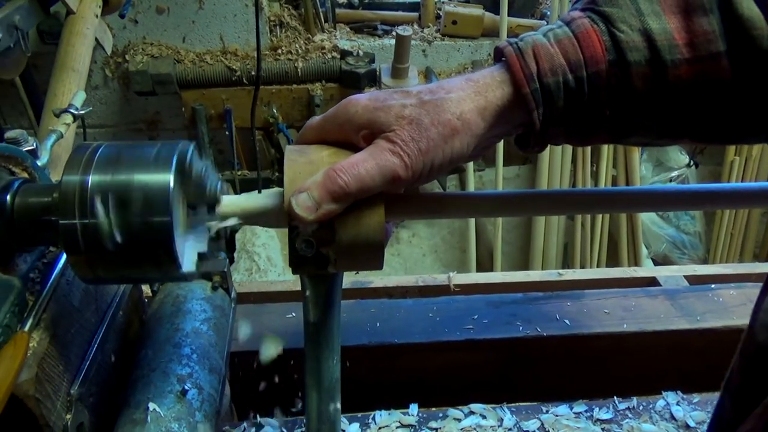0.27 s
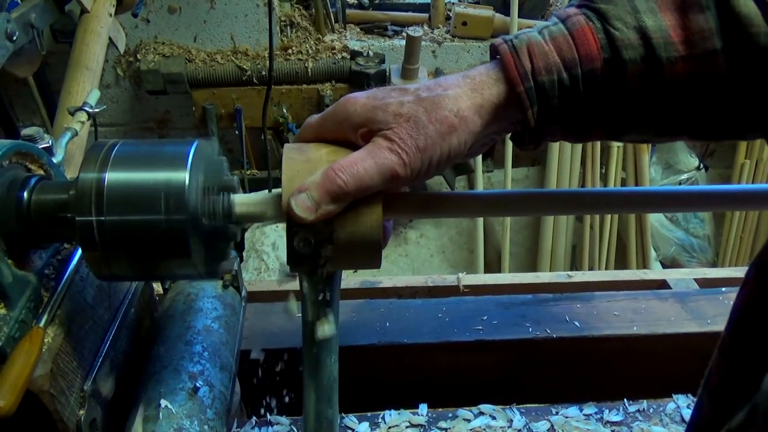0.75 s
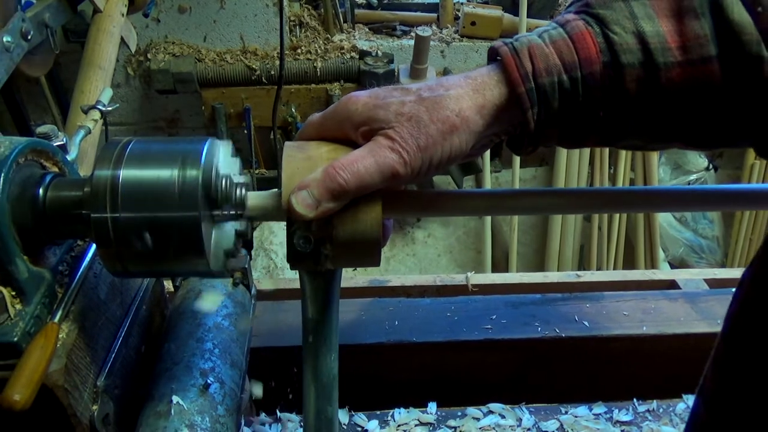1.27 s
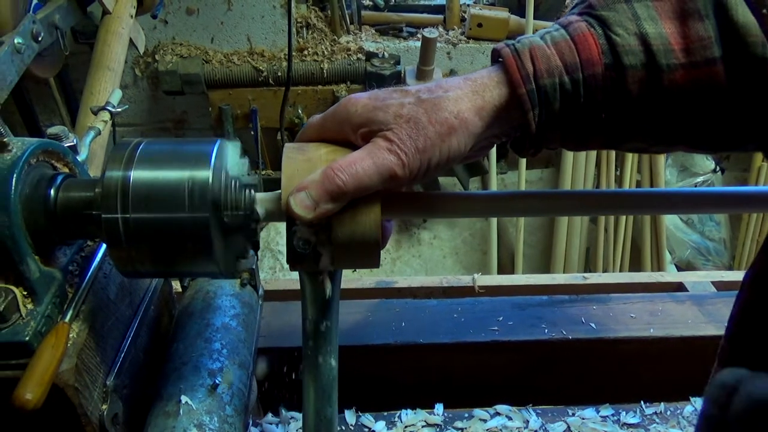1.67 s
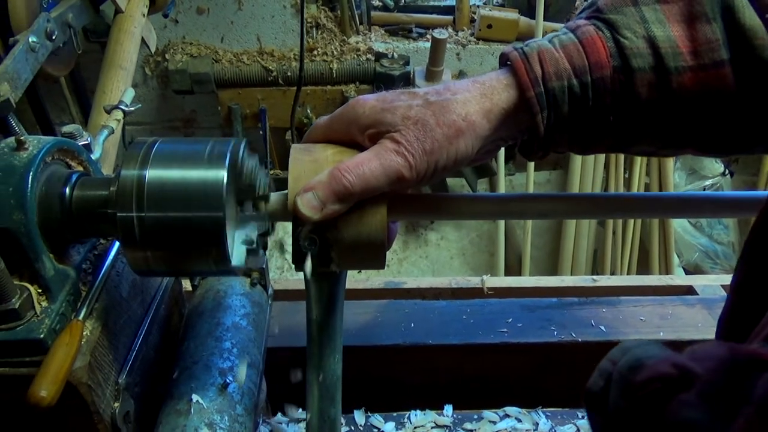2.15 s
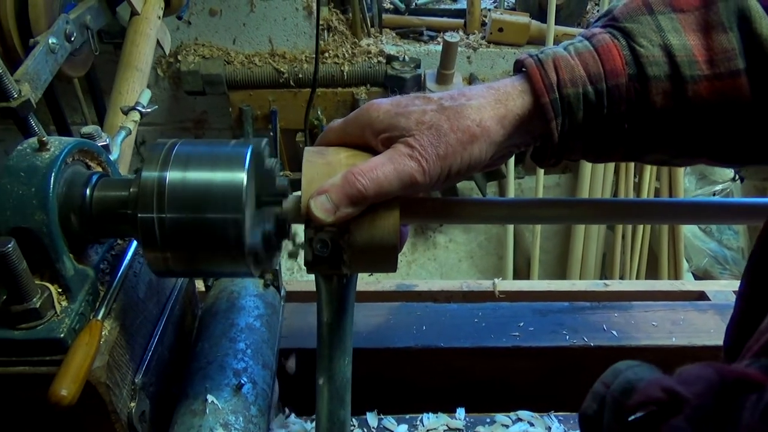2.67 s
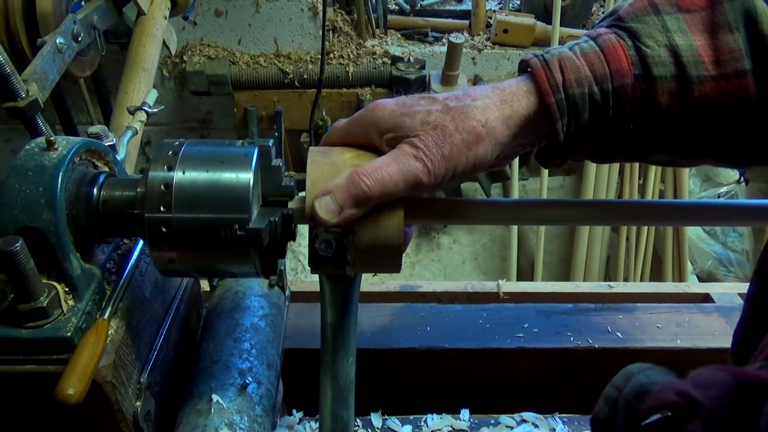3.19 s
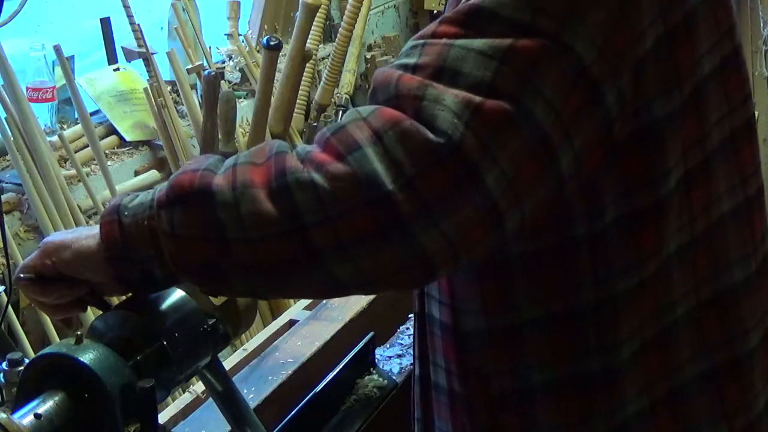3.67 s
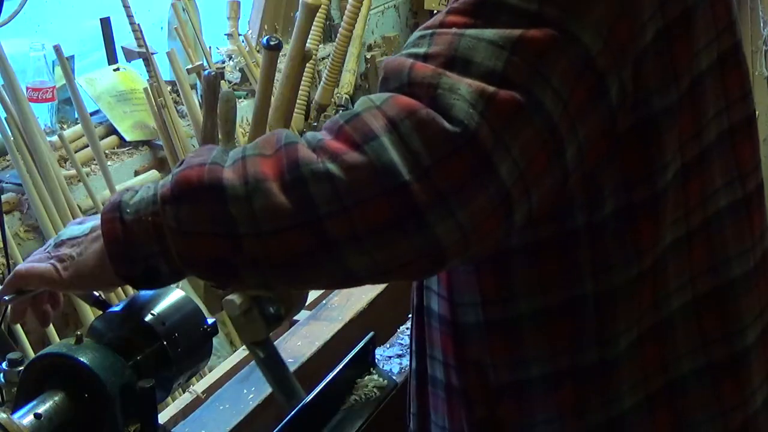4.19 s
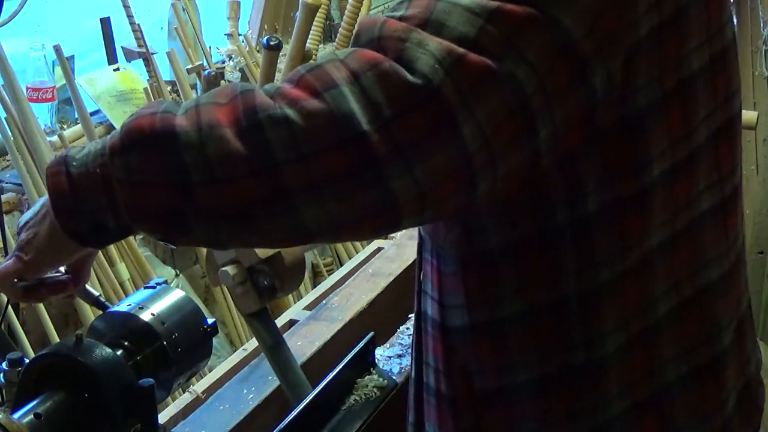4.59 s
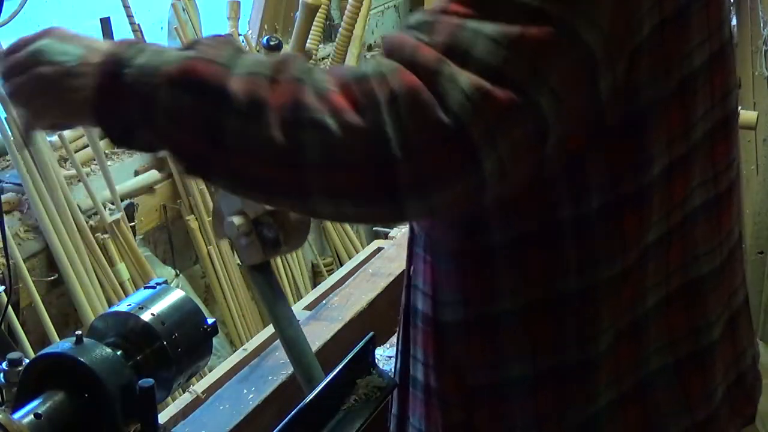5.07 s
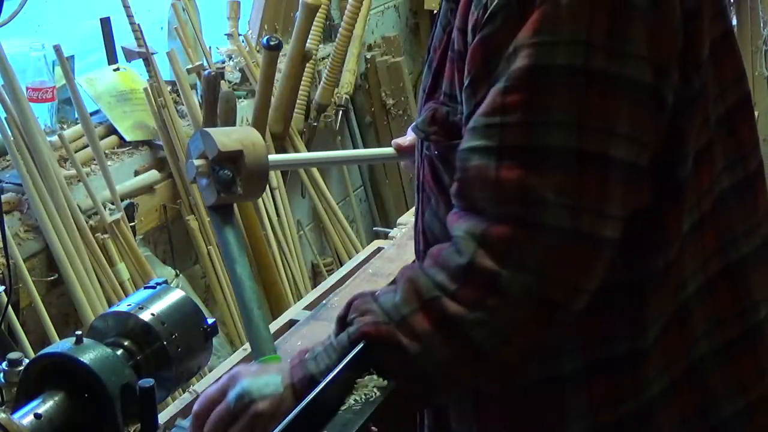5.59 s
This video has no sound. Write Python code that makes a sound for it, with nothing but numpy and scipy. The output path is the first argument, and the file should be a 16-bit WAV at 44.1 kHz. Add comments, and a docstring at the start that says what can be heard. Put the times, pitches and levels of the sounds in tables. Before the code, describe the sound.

From the start a wood lathe runs close by, its motor humming and the spinning rod whirring while a hand-held cutter shaves the wood with a pulsing hiss. Over it the blade gives a very high, warbling squeal, about fifteen chirps a second, creeping upward in pitch. Between 1.3 and 1.7 seconds the squeal shifts to a lower, still shrill register and grows stronger. The motor and hiss fade from about 2 seconds and are gone near 3; the squeal stops just after, leaving near silence. From 3.5 seconds there is quiet workshop room tone with very faint rapid ticking and a few light clinks. Around 4.5 seconds a metal key knocks in the chuck with a short ring, followed by a cluster of sharp clinks near 4.9. A sleeve rustles softly, two small clinks come around 5.4 seconds, and faint tones come and go.

```python
"""A lathe turns a long wooden rod through a hand-held rounding cutter: the motor hums, bed and rod whirr,
shavings hiss. Twice a turn stick-slip friction makes the blade squeal in a W-shaped glide, first in a
high register, then in a low one. Near 3 s the whirr fades away, the squeal last. After a near silence
the quiet workshop is heard, with faint ticks: a chuck key clinks, a sleeve rustles, the key knocks in
the chuck and sets its modes ringing, and faint tones come and go."""
import sys
import numpy as np
from scipy import signal
from scipy.fft import rfft, irfft, next_fast_len
from scipy.io import wavfile
from scipy.ndimage import uniform_filter1d

SR = 44100
rng = np.random.default_rng(int(sys.argv[2]) if len(sys.argv) > 2 else 0)


def log_audio(samples):
    """Write samples as a 16-bit WAV file to the path given in sys.argv[1]."""
    # one column per channel
    frames = np.atleast_2d(samples).T
    # limit to full scale, then quantise
    limited = np.clip(frames, -1, 1)
    pcm = np.round(limited * 32767).astype(np.int16)
    wavfile.write(sys.argv[1], SR, pcm)


N = 257529
TIME = np.arange(N) / SR

# The running lathe fades: t/s, motor level/dB, whirr level/dB, hiss level/dB
LATHE_FADE = [(0, -38.5, -36.5, -36), (1.3, -38.5, -37.5, -35.5), (1.9, -40.5, -39.5, -38),
              (2.3, -43.5, -43, -41.5), (2.55, -46, -48, -45.5), (2.72, -50.5, -53, -50),
              (2.8, -54.5, -60, -56), (2.86, -56.5, -66.5, -62), (2.93, -65.5, -88, -81),
              (3.08, -79, -93, -87), (3.2, -82, -96, -110), (3.3, -97, -110, -120)]
# Motor lines: f/Hz, level/dB re motor
HUM_LINES = [(100, -15.5), (199.5, -17.5), (399, -18.5), (517, -23.5), (700, -22)]
# Spectra of the whirr and the shaving hiss: f/Hz, relative density/dB
WHIRR_SPECTRUM = [(15, -58.5), (25, -27), (93, -4.5), (149, -11), (196, -8), (333, -9.5), (395, -5.5),
                  (701, -5), (1270, -10), (1670, -3.5), (2400, -12.5), (2620, -13), (4000, -29.5),
                  (5200, -47), (8800, -120)]
SHAVING_SPECTRUM = [(1760, -25), (3000, -3), (3280, -4.5), (3570, -12), (3800, -11), (4680, -4.5),
                    (5090, -12), (7050, 0.5), (8220, -5.5), (8750, -9.5), (9650, 0.5), (10300, -10),
                    (13300, -8), (15200, -23), (15800, -23)]
# Resonances of bed and rod, free length of rod, and cutter: f/Hz, nominal width/Hz, relative level/dB
BODY_MODES = [(727, 62, -13), (1140, 51, -15.5), (2106, 410, -21.5), (2606, 45, -17), (3050, 60, -16),
              (3188, 45, -17.5)]
ROD_MODES = [(1680, 143, -2)]
CUTTER_MODES = [(3446, 42, -25), (3560, 30, -26), (4004, 100, -24.5), (4700, 88, -24), (4800, 60, -25),
                (6145, 140, -15.5), (6570, 460, -22), (7150, 180, -10), (7940, 120, -10.5),
                (11700, 190, -29), (13900, 250, -22)]
# Dips in the lathe's sound where paths cancel: f/Hz, width/Hz
NOTCHES = [(2440, 43), (3340, 82), (3950, 26), (4200, 26)]
# The off-round blank meets the blade twice a turn. One row per bite and register:
# t/s, length/ms, base pitch f/Hz, base level/dB, extra level at entry/dB, tilt from start to end/dB
BITES = [(-0.0437, 63.0, 8200, -62, 0, 58), (0.0193, 73.5, 8600, -42.5, -25.5, -12.5),
         (0.093, 62.5, 8700, -43, -27, -4), (0.1553, 65.7, 8780, -43.5, -8, -1),
         (0.221, 64.9, 8770, -42.5, -19.5, -4.5), (0.2864, 68.5, 8940, -40.5, -24.5, -2),
         (0.3542, 65.4, 8950, -42, -4, -2.5), (0.419, 68.1, 8920, -39.5, -12, -1),
         (0.4879, 62.8, 8950, -42, -5, 3), (0.551, 71.6, 9060, -40.9, -6.5, -8),
         (0.6223, 65.2, 9270, -42.5, 8, -6), (0.6873, 64.7, 9120, -41.9, 1, 2),
         (0.7524, 65.8, 9540, -39, -13, -8), (0.818, 62.3, 9610, -40, -4, -4.5),
         (0.8804, 67.6, 9600, -39.7, -24.5, -1), (0.948, 69.2, 9670, -38.3, -16.5, -30.5),
         (1.0171, 65.9, 9900, -40, -20, -8.5), (1.083, 67.1, 9800, -37, -11.5, -13.5),
         (1.1507, 65.1, 9770, -40.9, 4.5, -1.5), (1.2158, 62.5, 9930, -42.9, -16.5, -54.5),
         (1.2782, 63.5, 10350, -51, 28.5, 17.5), (1.2792, 77.2, 5600, -57, -15.5, -47),
         (1.3412, 69.4, 10360, -44.5, 3, 14), (1.3571, 52.1, 5390, -69, 24.5, 19.5),
         (1.4077, 74.6, 5570, -55, -13.5, -40), (1.41, 64.8, 10480, -47, 21, 21),
         (1.4764, 62.8, 10400, -41.5, -14, -13), (1.4831, 58.0, 5750, -43, -5.5, -9.5),
         (1.5376, 69.6, 10400, -54.8, 8.5, 35), (1.541, 66.6, 5630, -53, -13, -36),
         (1.6085, 64.8, 5450, -48, -25, 0), (1.6078, 62.4, 10450, -55.5, 4.5, 35),
         (1.6701, 70.7, 10430, -62, -25, 55), (1.6732, 68.5, 5880, -47.1, -9, -20),
         (1.7408, 64.3, 5580, -42.5, -15, 13.5), (1.8051, 66.1, 6050, -42, 2, -1.5),
         (1.8712, 64.4, 5640, -40, -25, 11.5), (1.9355, 66.6, 6090, -42, 11, 6),
         (2.002, 66.5, 5760, -39, -3.5, 13.5), (2.0691, 65.7, 6160, -40.5, -0.5, 2),
         (2.1349, 65.9, 5890, -37.5, -8.5, 12), (2.2015, 63.7, 6330, -40.1, 13.5, 14),
         (2.2641, 65.0, 6020, -35.5, -11, 8), (2.3291, 68.7, 6420, -40, -9, 11),
         (2.3978, 65.7, 6050, -36.5, 0, 16), (2.4633, 64.0, 6490, -39, -5.5, 5),
         (2.5282, 65.1, 6070, -36, 5.5, 8), (2.5931, 66.6, 6510, -38, 12.5, 10.5),
         (2.659, 66.4, 6080, -37.5, 10, 16), (2.7256, 67.1, 6470, -39.7, 16, 14),
         (2.793, 61.8, 6010, -37.5, 8, 10.5), (2.8543, 66.3, 6450, -38.5, 19, 15),
         (2.9222, 84.1, 6190, -36, 4.5, 14.5), (3.005, 137.8, 6640, -41.5, 13.5, 9.5)]
# W-shaped course of a bite on the blank's faces A and B, as offsets from its base:
# share of bite, f on A/Hz, f on B/Hz, level on A/dB, level on B/dB
HIGH_COURSE = [(0.0, 2032.5, 1060, -13.5, -16.5), (0.079, 1388.5, 1050, -9.5, 6.5),
               (0.15, 690.5, 972.5, -1, 10), (0.23, 41, 90.5, 5, 0.5), (0.31, 11, -190, 3.5, -1),
               (0.38, 159.5, -80.5, 5.5, 3), (0.461, 410, 160.5, 3.5, 4), (0.54, 550, 470.5, 7, 6),
               (0.62, 469.5, 350.5, 2.5, 5.5), (0.69, 49.5, -120, 8, 3.5), (0.77, -160, -170, 4.5, -1.5),
               (0.85, -50, -170, 4, 6), (0.92, 89.5, 102.5, 0.5, 0.5), (1.0, 338.5, 178, -20, -16)]
LOW_COURSE = [(0.0, 300, 370, -14, -9), (0.08, 1219.5, 869.5, -11.5, -8.5), (0.15, 1070, 1649.5, -3, -4),
              (0.23, 49.5, 529.5, 2.5, 2), (0.31, 22.5, 59.5, 3, 0.5), (0.38, 371, 590, 7, 2),
              (0.46, 368.5, 998.5, 7.5, 8), (0.54, 500, 1100.5, 8, 5.5), (0.62, 592.5, 1169.5, -0.5, 7),
              (0.69, 271.5, -1.5, -5.5, -4), (0.77, -400, 19.5, -2, -7), (0.85, 221, -33, 3.5, -7.5),
              (0.92, 350, 749, -4, -1), (1.0, 280.5, 910.5, -15, -5)]
# Blade modes that draw the squeal to themselves: f/Hz, pull (0-1), gain/dB
HIGH_MODES = [(8320, .65, 6), (9000, .45, 3), (9780, .82, 1), (10520, .85, 3), (11300, .3, -6)]
LOW_MODES = [(5775, 0.67, 7), (6220, 0.57, 1), (6460, 0.39, 2), (7060, 0.74, -7.5), (7950, 0.43, 5.5)]
# Lone peeps of the blade: t/s, length/ms, f/Hz, level/dB
PEEPS = [(0.074, 12, 12600, -47.5), (0.206, 14, 12650, -45.5), (0.274, 8, 12800, -44),
         (0.362, 15, 13600, -44), (0.391, 14, 13480, -45.5), (0.87, 20, 4860, -46), (0.976, 16, 13580, -47),
         (1.003, 18, 4960, -42.5), (1.367, 11, 9940, -35), (1.785, 15, 11300, -37), (2.045, 8, 11250, -41),
         (2.113, 8.9, 11230, -41), (2.177, 8.6, 11250, -42), (2.244, 6.7, 11200, -35),
         (2.379, 7.7, 11250, -42), (3.201, 12.4, 7920, -46)]
# The stopping motor lurches: t/s, length/ms, level/dB
LURCHES = [(2.98, 10.4, -59.5), (3.03, 14, -62.5), (3.12, 50, -78)]
# The quiet workshop: t/s, rumble level/dB, deep rumble level/dB, hiss level/dB
WORKSHOP_LEVELS = [(3.52, -69, -68, -67.5), (3.88, -65.5, -66, -71), (4.0, -63, -61, -71),
                   (4.3, -63, -63.5, -71), (4.7, -56.5, -63.5, -70), (5.33, -56.5, -62.5, -67),
                   (5.47, -60, -65, -69), (5.84, -63.5, -61, -66)]
# Spectra of its rumble, deep rumble and hiss, and of the sleeve: f/Hz, relative density/dB
RUMBLE_SPECTRUM = [(88, -41.5), (150, -12), (242, -2.5), (272, 0.5), (398, -9), (473, -2), (594, -10),
                   (634, -5), (947, -4.5), (1370, -32), (2000, -36), (2600, -59), (4400, -120)]
DEEP_SPECTRUM = [(12, -38), (20, -12), (48, -0.5), (64, -2.5), (108, -2.5), (180, -8), (230, -37),
                 (400, -120)]
HISS_SPECTRUM = [(1300, 2), (2000, -1), (3300, -2.5), (4100, -3.5), (5160, -7), (6100, 0.5), (9800, -4.5),
                 (12500, -2), (15800, -10)]
RUSTLE_SPECTRUM = [(2000, -6.5), (3500, -3), (5200, -51), (6500, 2.5), (10500, 4), (12500, 1), (15700, -6)]
# Key clinks: t/s, nominal peak level/dB, colour f/Hz, tail t60/s, tail level/dB, ring level/dB re crack
CLINKS = [(3.5372, -51.5, 2500, 0.097, -6, -10), (3.9887, -50.5, 9280, 0.08, -18, -8),
          (4.033, -47, 12200, 0.08, -18, -11), (4.4658, -46, 2270, 0.08, -13, 3),
          (4.561, -31.5, 6770, 0.13, -14, 1.5), (4.611, -50, 6350, 0.08, -18, -8),
          (4.7057, -53, 2230, 0.08, -16, -6), (4.7354, -58, 7580, 0.08, -18, -13),
          (4.7536, -43.5, 13700, 0.097, -11, -6), (4.8264, -30, 9500, 0.063, -17, 3),
          (4.866, -35.5, 9440, 0.088, -4, -4), (4.874, -37, 10100, 0.08, -16, -6),
          (4.8789, -31.5, 8750, 0.087, -3, -0.5), (4.897, -33, 9250, 0.08, -19, -4),
          (4.9044, -44, 6700, 0.08, -18, -8), (5.3444, -44.5, 9750, 0.11, -7, -8),
          (5.4261, -47, 8260, 0.08, -18, -8)]
# Modes of the key: f/Hz, relative level/dB, t60/s
KEY_MODES = [(2660, -19, 0.019), (4100, 5, 0.0079), (6200, -7, .025), (6850, 8, 0.011), (7600, -3, 0.018),
             (9160, 1, 0.021), (9830, 5, 0.022), (10500, -15, .02), (12600, -20, .015)]
# The key knocks in the chuck: t/s, nominal peak level/dB, rattle length/ms
KNOCKS = [(4.468, -29, 31), (4.583, -30, 17), (4.609, -40.5, 55), (4.705, -59, 16)]
# Modes of the chuck: f/Hz, relative level/dB, nominal t60/s
CHUCK_MODES = [(510, -5, 0.37), (650, -8, 0.13), (815, -8.5, 0.31), (874, 5.5, .12), (922, -2.5, 0.21),
               (1100, -28, .12), (1230, -16, .15), (1386, -19, 0.41), (1870, -14, 0.069), (2240, -16, 0.11)]
# Sleeve rustles, the key dragging over metal, and deep thuds: t/s, length/ms, level/dB
RUSTLES = [(3.93, 55, -72.5), (4.03, 73, -65.5), (4.1, 42, -63.5), (4.88, 53, -64), (5.13, 70, -72),
           (5.27, 230, -71), (5.44, 61, -66), (5.75, 310, -66)]
SCUFFS = [(4.84, 24, -56.5), (4.91, 40, -65)]
THUDS = [(4.87, 80, -66), (5.5, 110, -63)]
# Faint tones: start t/s, end t/s, f/Hz, waver/Hz, level/dB
FAINT_TONES = [(4.6, 5.1, 275, 10, -66), (5.2, 5.62, 280, 10, -67), (5.1, 5.35, 775, 6, -71),
               (5.67, 5.85, 3208, 2, -73.5), (5.63, 5.85, 3941, 2, -79), (5.58, 5.85, 7677, 15, -79),
               (5.6, 5.85, 9133, 12, -82)]
# Echoes that differ between the two microphone ports: f/Hz, side level/dB re mid
SIDE_SPECTRUM = [(30, -17.5), (110, -31.5), (190, -27.5), (260, -12), (460, -19), (820, -15.5), (1100, -27),
                 (1470, -36), (1960, -17), (2500, -15), (2900, -61.5)]
# Lean towards one port: f/Hz, left minus right level/dB
LEAN_SPECTRUM = [(30, 0), (200, 0), (260, 1), (460, -1.8), (610, .8), (1000, -.3), (1600, 1.3), (2200, .5),
                 (2700, 0)]

HISS_PULSE_HZ, BRIGHTEN_DB_PER_S, LURCH_WHIRR_DB = 18, 1.58, -21
OVERTONE_DB, SQUEAL_ROUGHNESS, SLIP_LIMIT = -13.5, 0.13, 0.033
REGISTER_SPLIT_HZ, HIGH_PULL_WIDTH_HZ, LOW_PULL_WIDTH_HZ = 7700, 200, 320
ENTRY_END, ENTRY_FADE = 0.26, 0.08   # shares of a bite
GLIDE_LOSS_DB = 1   # per 100 Hz/ms of pitch movement
STOP_S, STOP_DB_PER_MS = 3.125, 10   # cutting stops and the squeal dies
WORKSHOP_FROM_S = 3.52
TICK_FROM_S, TICK_EVERY_S, TICK_DB = 3.556, 0.04005, -71
SHOP_T60_S, SHOP_DB, SHOP_SIDE_DB = 0.22, -19.5, -41
CUTOFF_HZ = 15740


def amp(db):
    """Amplitude ratio of a level: a factor of ten per 20 dB."""
    return 10 ** (np.asarray(db) / 20)


def unit_rms(x):
    """Normalisation to unit mean power."""
    return x / np.sqrt(np.mean(x ** 2) + 1e-20)


def in_time(rows):
    """Linear interpolation of each column at every sample."""
    s, *columns = np.transpose(rows)
    return [np.interp(TIME, s, c) for c in columns]


def at_hz(spectrum, hz):
    """Interpolation of a spectrum on a logarithmic frequency axis."""
    points_hz, db = np.transpose(spectrum)
    return np.interp(np.log(hz), np.log(points_hz), db, left=-90, right=-90)


def swells(rows):
    """Superposition of raised-cosine envelopes, each centred on its moment."""
    return sum(amp(db) * np.cos(np.pi * np.clip((TIME - s) / ms * 500, -.5, .5)) ** 2
               for s, ms, db in rows)   # ms is the width at half height


def drift(rate_hz):
    """Random fluctuation of unit rms: noise low-passed at the given rate."""
    step, settle = 40, 2000
    r = np.exp(-2 * np.pi * rate_hz * step / SR)
    slow = signal.lfilter([1], [1, -2 * r, r * r], rng.standard_normal(N // step + settle + 2))[settle:]
    return np.interp(np.arange(N) / step, np.arange(len(slow)), unit_rms(slow))


def filtered(x, hz, kind, order=2):
    """Filtering with a maximally flat passband."""
    return signal.sosfilt(signal.butter(order, hz, kind, fs=SR, output="sos"), x)


def resonance(x, hz, width_hz):
    """Forced response of a resonator: a two-pole band-pass with unit peak gain."""
    r = np.exp(-np.pi * width_hz / SR)
    gain = (1 - r * r) / 2
    return signal.lfilter([gain, 0, -gain], [1, -2 * r * np.cos(2 * np.pi * hz / SR), r * r], x)


def ring(x, hz, t60):
    """Damped oscillator: a unit impulse starts a decaying sine of unit amplitude."""
    r, w = amp(-60 / (t60 * SR)), 2 * np.pi * hz / SR
    return signal.lfilter([0, np.sin(w)], [1, -2 * r * np.cos(w), r * r], x + 1e-18)


def banded_noise(spectrum, flicker_db):
    """Random amplitude modulation of quarter-octave noise bands; unit rms."""
    bottom_hz, top_hz = spectrum[0][0], spectrum[-1][0]
    edges = np.geomspace(bottom_hz, top_hz, int(4 * np.log2(top_hz / bottom_hz)) + 1)
    out, together, white = 0, drift(8.5), rng.standard_normal((2, N))
    for k, (low, high) in enumerate(zip(edges, edges[1:])):
        db = at_hz(spectrum, np.sqrt(low * high)) + flicker_db * (0.2 * together + drift(19))
        out = out + amp(db) * filtered(white[k % 2], [low, high], "band")
    return unit_rms(out)


def resonant_noise(modes):
    """Random excitation of modes, each formed by two resonators in cascade."""
    white = rng.standard_normal(N)
    return sum(amp(db) * unit_rms(resonance(resonance(white, hz, 1.28 * width), hz, 3.0 * width))
               for hz, width, db in modes)


def lathe():
    """Forced vibration: mains hum, whirr in bed and rod, and shaving hiss; interference cuts notches."""
    motor_db, whirr_db, hiss_db = in_time(LATHE_FADE)
    lurch = swells(LURCHES)
    hum = sum(np.sqrt(2) * amp(db + 1.5 * drift(4.9))
              * np.sin(2 * np.pi * (hz * TIME + 0.042 * drift(15))) for hz, db in HUM_LINES)
    running = amp(-4.5) * banded_noise(WHIRR_SPECTRUM, flicker_db=1.9)
    rumble = filtered(running, 900, "low")
    pulse = amp(0.47 * np.sin(2 * np.pi * HISS_PULSE_HZ * TIME + 0.52))
    hiss = pulse * (banded_noise(SHAVING_SPECTRUM, flicker_db=1.66) + resonant_noise(CUTTER_MODES))
    hiss += (amp(BRIGHTEN_DB_PER_S * TIME) - 1) * filtered(hiss, 8800, "high")
    # the free length of rod rings less as the cutter nears the chuck
    rod = amp(-2.2 * TIME) * resonant_noise(ROD_MODES)
    whirr = running - rumble + resonant_noise(BODY_MODES) + rod
    out = (amp(whirr_db) + amp(LURCH_WHIRR_DB) * lurch) * whirr + amp(hiss_db) * hiss
    for hz, width in NOTCHES:
        out = out - 0.62 * resonance(out, hz, width)
    return out + (amp(motor_db) + lurch) * (hum + rumble)


def stick_slip(hz, level):
    """Stick-slip oscillation: a rough tone and its second harmonic follow a pitch and an amplitude."""
    hz = uniform_filter1d(hz, size=60)
    level = SLIP_LIMIT * np.tanh(level / SLIP_LIMIT)   # the slip cannot grow past a limit
    height = np.sqrt(2) * uniform_filter1d(level, size=60)
    phase = 2 * np.pi * np.cumsum(hz + 60 * drift(147)) / SR
    # uneven grain smears the lines
    grain = unit_rms(filtered(rng.standard_normal((2, N)), 600, "low", order=4))
    tone = (1 + SQUEAL_ROUGHNESS * grain[0]) * np.sin(phase)
    overtone = (1 + 0.35 * grain[1]) * np.sin(2 * phase)
    return height * (tone + amp(OVERTONE_DB - .012 * np.maximum(hz - 7150, 0)) * overtone)


def bites(rows, course, modes, width_hz):
    """Frequency pulling: the blade's nearest modes bend the glide of each bite, the two faces in turn."""
    start, ms, pitch_hz, level_db, entry_db, tilt_db = np.transpose(rows)
    bite = np.maximum(np.searchsorted(start, TIME) - 1, 0)
    share = (TIME - start[bite]) / ms[bite] * 1000
    course_shares, *columns = np.transpose(course)
    hz_a, hz_b, db_a, db_b = [np.interp(share, course_shares, c) for c in columns]
    free_hz = pitch_hz[bite] + np.where(bite % 2, hz_b, hz_a)
    mode_hz, pull, mode_db = np.transpose(modes)[:, :, None]
    detuning = ((free_hz - mode_hz) / width_hz) ** 2
    weight = np.exp(detuning.min(axis=0) - detuning)
    weight /= weight.sum(axis=0)
    hz = free_hz + np.sum(weight * pull * (mode_hz - free_hz), axis=0)
    hz_per_ms = uniform_filter1d(np.abs(np.gradient(hz)), size=90) * SR / 1000
    db = level_db[bite] + np.where(bite % 2, db_b, db_a)
    db += entry_db[bite] * np.clip((ENTRY_END - share) / ENTRY_FADE, 0, 1)
    db += tilt_db[bite] * (np.clip(share, 0, 1) - .5)
    db -= GLIDE_LOSS_DB * hz_per_ms / 100
    db -= STOP_DB_PER_MS * np.maximum(TIME - STOP_S, 0) * 1000
    db += np.sum(weight * mode_db, axis=0) + 1.5 * drift(60)
    cutting = (TIME > start[0]) & (TIME < start[-1] + ms[-1] / 1000)
    return stick_slip(hz, cutting * amp(db))


def squeal():
    """Friction-driven vibration of the blade in two registers, which can overlap, and in lone peeps."""
    s, ms, hz, db = np.transpose(PEEPS)
    nearest = np.searchsorted((s[1:] + s[:-1]) / 2, TIME)
    peeps = stick_slip(hz[nearest], swells(zip(s, ms, db)))
    high = [b for b in BITES if b[2] > REGISTER_SPLIT_HZ]
    low = [b for b in BITES if b[2] <= REGISTER_SPLIT_HZ]
    return (bites(high, HIGH_COURSE, HIGH_MODES, HIGH_PULL_WIDTH_HZ)
            + bites(low, LOW_COURSE, LOW_MODES, LOW_PULL_WIDTH_HZ) + peeps)


def workshop():
    """Superposition of modulated noise (rumble, thuds, hiss, scuffs, rustles) and faint wavering tones."""
    rumble_db, deep_db, hiss_db = in_time(WORKSHOP_LEVELS)
    out = amp(rumble_db) * banded_noise(RUMBLE_SPECTRUM, flicker_db=1.45)
    out += (amp(deep_db) + swells(THUDS)) * banded_noise(DEEP_SPECTRUM, flicker_db=2.5)
    out += (amp(hiss_db) + swells(SCUFFS)) * banded_noise(HISS_SPECTRUM, flicker_db=1.0)
    out += swells(RUSTLES) * amp(2.2 * drift(150)) * banded_noise(RUSTLE_SPECTRUM, flicker_db=1.2)
    for start, end, hz, waver_hz, db in FAINT_TONES:
        gate = uniform_filter1d(1. * (TIME > start) * (TIME < end), size=1500, mode="nearest")
        height = gate * np.sqrt(2) * amp(db + 2.5 * drift(12))
        out += height * np.sin(2 * np.pi * np.cumsum(hz + waver_hz * drift(15)) / SR)
    return out * (TIME > WORKSHOP_FROM_S)


def key_clinks():
    """Impact excitation: a crack dies as noise and rings the key's modes, favouring those near its colour."""
    out = np.zeros(N)
    since = TIME[:SR // 4]
    for s, db, hz, t60, tail_db, ring_db in CLINKS:
        envelope = amp(-60 * since / .008) + amp(tail_db - 60 * since / t60)
        burst = rng.standard_normal(len(since)) * envelope
        crack = resonance(resonance(burst, hz, 0.11 * hz), hz, 0.34 * hz)
        crack += 0.14 * resonance(burst, 2300, 2800)
        ringing = sum(amp(mode_db - 8 * abs(np.log2(mode_hz / hz)) + 2.5 * rng.normal())
                      * ring(burst, mode_hz, mode_t60) for mode_hz, mode_db, mode_t60 in KEY_MODES)
        hit = unit_rms(crack) + amp(ring_db) * unit_rms(ringing)
        start = round(s * SR)
        out[start:start + len(since)] += amp(db - 2.5) * hit / np.abs(hit).max()
    return out


def ticking():
    """A periodic impulse train of uneven strength excites two quickly damped resonances."""
    at = (np.arange(TICK_FROM_S, N / SR, TICK_EVERY_S) * SR).astype(int)
    clicks = np.zeros((2, N))
    clicks[:, at] = amp(TICK_DB + 2 * rng.standard_normal((len(at), 2)).T)
    return ring(clicks[0], hz=4300, t60=.03) + 1.1 * ring(clicks[1], hz=2700, t60=.02)


def chuck_knocks():
    """Modal response of the chuck to a short dull rattle of contacts, led by a sharp first touch."""
    out = np.zeros(N)
    since = TIME[:SR // 2]
    attack = np.minimum(since / .002, 1)
    first_touch = 3 * (since > .002) * (since < .0032)
    for s, db, ms in KNOCKS:
        decay = amp(-60 * np.maximum(since - ms / 1000, 0) / .13)
        rattle = rng.standard_normal(len(since)) * (attack + first_touch) * decay
        ringing = sum(amp(mode_db) * ring(rattle, hz, 0.49 * t60) for hz, mode_db, t60 in CHUCK_MODES)
        blow = filtered(ringing, [430, 2300], "band")
        start = round((s - .003) * SR)   # the swell begins just before
        out[start:start + len(since)] += amp(db - 1.5) * blow / np.abs(blow).max()
    return out


def shop_echo(x, t60):
    """Reverberation: convolution with a decaying noise tail of unit energy, new at every call."""
    since = TIME[:SR // 2]
    tail = rng.standard_normal(len(since)) * amp(-60 * since / t60) * (since > .002)
    return signal.fftconvolve(x, tail / np.sqrt(np.sum(tail ** 2)))[:N]


def scene():
    """Superposition at two close microphone ports, which differ only by echoes and a slight lean."""
    sharp = squeal() + chuck_knocks() + key_clinks()
    floor = amp(-99) * banded_noise(RUMBLE_SPECTRUM, flicker_db=4.0)
    mid = sharp + amp(SHOP_DB) * shop_echo(sharp, SHOP_T60_S) + lathe() + workshop() + ticking() + floor
    size = next_fast_len(N)
    hz = np.arange(size // 2 + 1) * SR / size
    lean_db = at_hz(LEAN_SPECTRUM, np.clip(hz, LEAN_SPECTRUM[0][0], LEAN_SPECTRUM[-1][0]))
    lean = np.tanh(lean_db * np.log(10) / 40)   # level difference as a side-to-mid ratio
    echo_gain = amp(at_hz(SIDE_SPECTRUM, np.maximum(hz, SIDE_SPECTRUM[0][0])))
    side = irfft(rfft(mid, size) * lean + rfft(shop_echo(mid, t60=.06), size) * echo_gain, size)[:N]
    side += amp(SHOP_SIDE_DB) * shop_echo(sharp, t60=0.039)
    return np.array([mid + side, mid - side])


def record(dry):
    """Band limiting: an elliptic low-pass cuts the top steeply."""
    return signal.sosfilt(signal.ellip(14, .3, 65, CUTOFF_HZ, fs=SR, output="sos"), dry)


dry = scene()
out = record(dry)
log_audio(out)
```